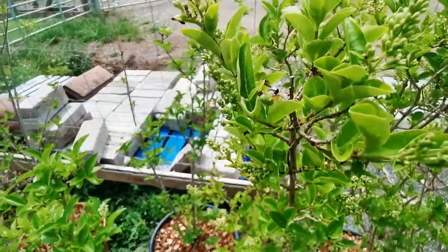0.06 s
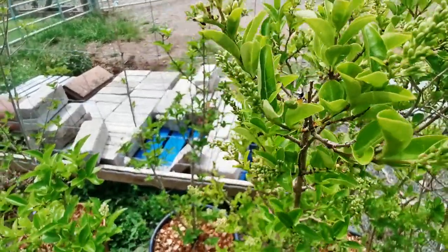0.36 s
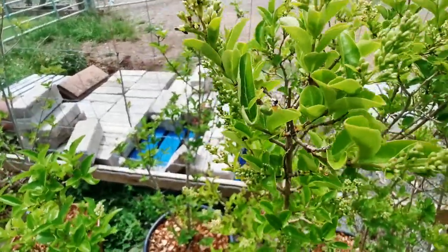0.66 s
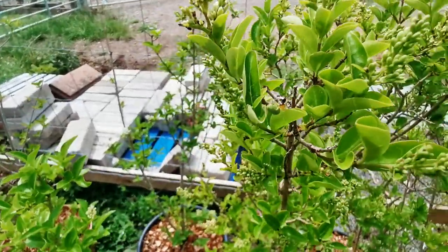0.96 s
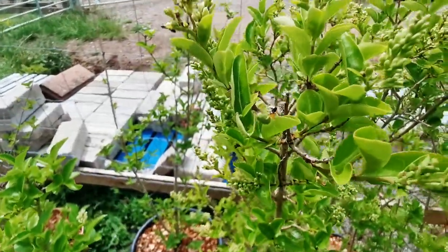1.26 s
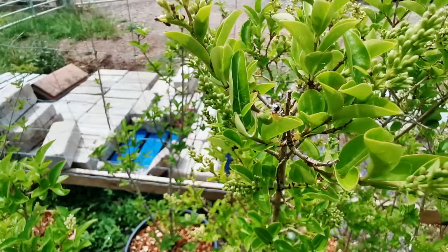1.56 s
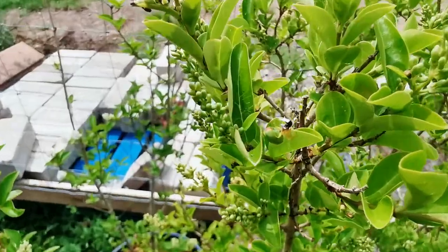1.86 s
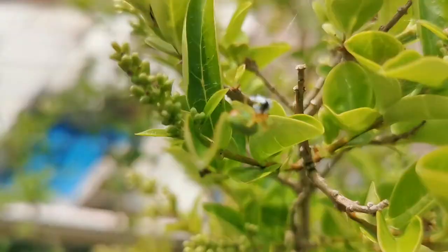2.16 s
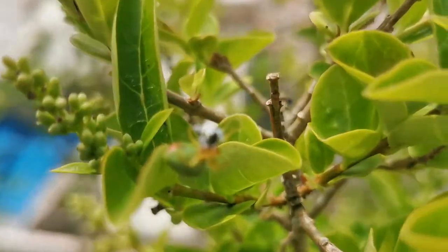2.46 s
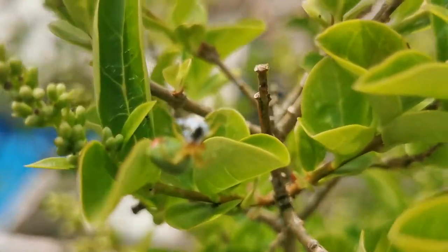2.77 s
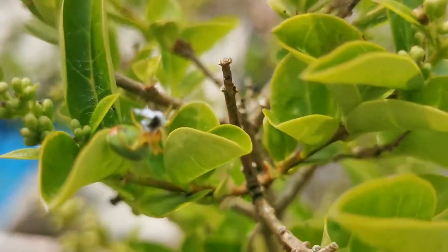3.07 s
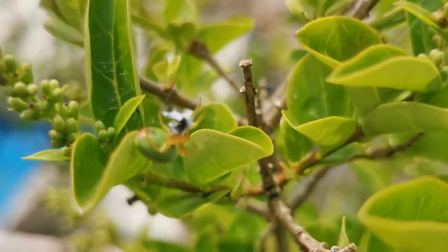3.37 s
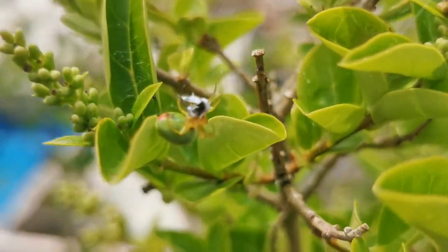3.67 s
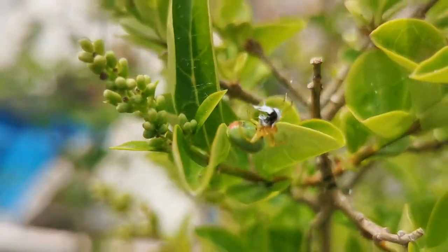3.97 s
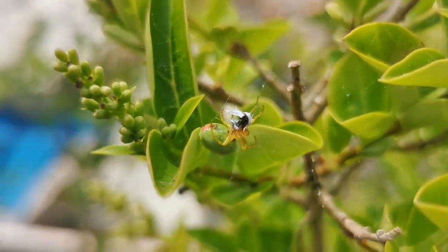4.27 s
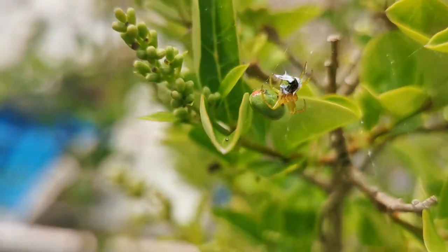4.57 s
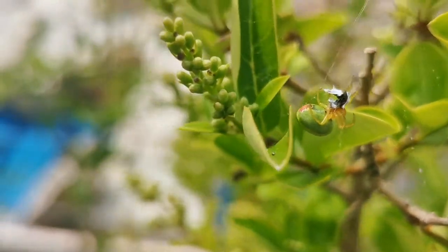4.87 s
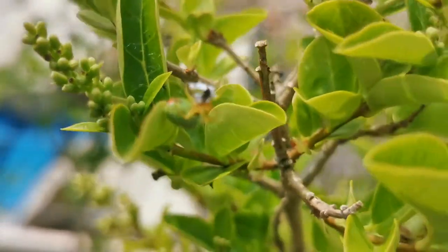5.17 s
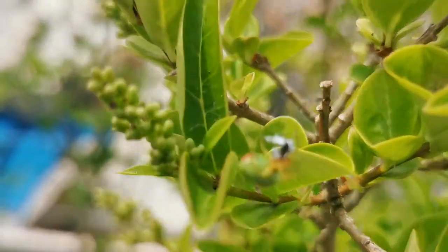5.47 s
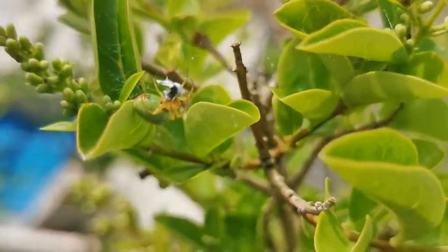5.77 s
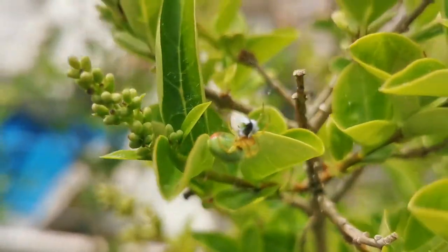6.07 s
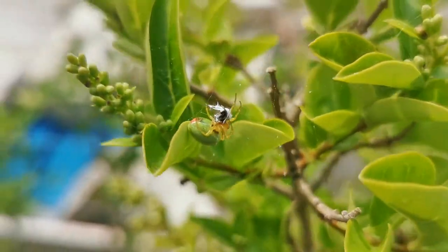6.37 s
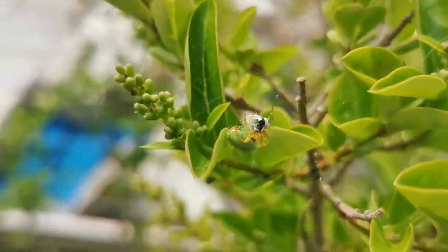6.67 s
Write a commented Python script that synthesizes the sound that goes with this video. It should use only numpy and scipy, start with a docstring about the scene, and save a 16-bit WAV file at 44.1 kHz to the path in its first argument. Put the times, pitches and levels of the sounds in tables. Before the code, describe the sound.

Close handling noise, with scratchy rubs, sharp clicks and dull knocks, gives way to low wind rumble over a faint hiss of leaves.

```python
"""A garden hedge in a breeze, heard at a handheld phone with two microphones.
Fingers shift on the case by the right microphone: skin rubs, sticks and snaps free, fingertips knock
and tick, the grip bumps. The handling is at the microphone itself, so it is dry and mostly in one channel.
Gusts buffet both ports; faint leaf hiss fills the garden."""
import sys
import numpy as np
from scipy import signal
from scipy.fft import rfft, irfft
from scipy.io import wavfile
from scipy.ndimage import uniform_filter1d

SR = 44100
rng = np.random.default_rng(int(sys.argv[2]) if len(sys.argv) > 2 else 0)


def wav_record(signal):
    """Record a signal, one row per channel, as 16-bit PCM in the file named by sys.argv[1]."""
    frames = np.transpose(np.atleast_2d(signal))
    bounded = np.clip(frames, -1, 1)
    # unit amplitude maps onto the largest positive 16-bit level
    quanta = np.round(bounded * 32767).astype(np.int16)
    wavfile.write(sys.argv[1], SR, quanta)


N = 301203
TIME_S = np.arange(N) / SR


# Finger strokes: t/s, hold/s, level/dB, dull re bright/dB, slips re hiss/dB, gap ring/dB
FINGER_STROKES = [(0.729, 0.021, -52.5, -3, 10, 5), (0.793, 0.11, -49.5, -2.5, 9.5, 0),
                  (0.978, 0.034, -51, -2.5, 1, 0), (1.073, 0.036, -66, 6, 12, 7),
                  (1.367, 0.045, -46.5, -2.5, 12.5, 10), (1.423, 0.063, -42, -2.5, 0, 9),
                  (1.502, 0.032, -44.5, 2.5, 7, 1), (1.703, 0.1, -58.5, 2, 3.5, 18),
                  (1.8, 0.21, -58.5, 1.5, 3, 7), (2.12, 0.11, -57, 1, 6, 12),
                  (2.215, 0.081, -46.5, -4, 0, 8), (2.355, .05, -59, -9, 4, -24),
                  (3.975, 0.15, -66, 5, 0, -10), (4.636, 0.072, -64, -6, -4, 16),
                  (5.261, 0.029, -41, 2, -11, 10), (5.321, 0.054, -41.5, 4.5, 0, 7),
                  (5.44, 0.028, -48.5, -1, -8, -9), (5.523, 0.017, -53, 1, 0, -29),
                  (5.575, 0.14, -66.5, -2, 4, -30), (5.763, 0.047, -50, 7.5, 0, -35),
                  (5.836, 0.031, -49, 9.5, -1, -35), (5.939, 0.031, -52, 7, -8, -11),
                  (5.988, 0.046, -61, 1, 5, -34), (6.137, .13, -65, 4.5, 4, -31)]

def finger(press_db_per_s=629, lift_db_per_s=508):
    """Friction level, dull part, grit and gap ring in dB over time; the strongest stroke sets the touch."""
    levels_db = swells(FINGER_STROKES, press_db_per_s, lift_db_per_s)
    touch_db = np.array(FINGER_STROKES)[levels_db.argmax(axis=0), 3:].T
    return levels_db.max(axis=0), *uniform_filter1d(touch_db, size=441, axis=1)


# Sliding skin spectrum: f/Hz, gain/dB
SKIN_SPECTRUM = [(120, 8), (350, 1), (750, 2), (1100, -1.5), (1600, -1), (2500, -7), (3500, -8),
                 (5500, -7.5), (7700, -28), (9200, -21.5), (11000, -18.5), (13000, -26), (15500, -30)]

def rub(level_db, dull_db, grit_db, gap_db, slips_per_s=560, spread_db=2.5, judder_db=3.5,
        split_hz=1400, gap_hz=2650, gap_width_hz=1000):
    """Tiny uneven slips over smooth hiss; the pressure judders and the gap under the finger rings."""
    sizes = gain_of(spread_db * np.minimum(rng.exponential(1, N), 3.5)) * rng.choice([-1, 1], N)
    slips = sizes * arrivals(slips_per_s)
    slip_pulse = impulse(lambda hz: db_at(SKIN_SPECTRUM, hz))
    crackle = unit_rms(signal.oaconvolve(slips, slip_pulse)[:N])
    hiss = unit_rms(noise(SKIN_SPECTRUM))
    grit, gap = gain_of(grit_db), gain_of(gap_db)
    skin = (grit * crackle + hiss) / np.hypot(grit, 1) * gain_of(judder_db * drift(160))
    dull = signal.sosfiltfilt(signal.butter(2, split_hz, fs=SR, output="sos"), skin)
    ring = unit_rms(signal.lfilter(*signal.iirpeak(gap_hz, gap_hz / gap_width_hz, SR), skin))
    bright = (unit_rms(skin - dull) + gap * ring) / (1 + gap)
    friction = bright + gain_of(dull_db) * unit_rms(dull)
    return np.array([np.zeros(N), gain_of(level_db) * friction])


# Case-to-port response: f/Hz, gain/dB
PORT_RESPONSE = [(40, -9), (400, -7), (1000, -4.5), (1600, -4), (2500, -2), (3500, -8.5), (5500, -11),
                 (7700, -24.5), (9200, -20.5), (11000, -16.5), (13000, -29), (15500, -36)]

def contact_db(hz, treble_db, ring_hz, ring_db, half_width_hz=960):
    """Spectrum of a case-borne contact at the port, with a treble shelf and one ring."""
    shelf_db = db_at([(3000, 0), (10000, treble_db)], hz)
    peak_db = ring_db / (1 + ((hz - ring_hz) / half_width_hz) ** 2)
    return db_at(PORT_RESPONSE, hz) + shelf_db + peak_db


def snap(treble_db, ring_hz, ring_db, bass_db=4, rebound_s=0.001314, rebound_ratio=0.15):
    """Skin snaps free and lands again; the gap under the finger rings."""
    delay_s = rebound_s * rng.uniform(0.702, 1.3)
    def spectrum_db(hz):
        shelf_db = db_at([(380, bass_db), (2000, 0)], hz)
        hollow_db = rebound_db(hz, delay_s, rebound_ratio)
        return contact_db(hz, treble_db, ring_hz, ring_db) + shelf_db + hollow_db
    return impulse(spectrum_db)


# Loud skin snaps: t/s, strength/dB, treble/dB, ring f/Hz, ring/dB
SKIN_SNAPS = [(0.725, -1.5, 0, 2570, 4), (0.8014, -12, 4.5, 2010, 9), (0.835, -6.5, 8.5, 3180, 17),
              (0.841, -15, 13, 3120, 19), (0.8572, -0.5, 4, 2270, 8), (0.8713, -7.5, 9, 3260, 18.5),
              (0.8774, -13, 8, 3220, 19), (0.9085, -3.5, -5, 2580, 9), (0.9177, -10, 4.5, 2650, 6),
              (0.9791, -10.5, 1, 2650, 5.5), (0.991, -4, -4.5, 5300, 14.5), (1.0109, -6.5, -7, 2650, 3),
              (1.1, -13, 1, 4750, 6.5), (1.2087, -5, -9, 2650, -0.5), (1.3733, 0.5, -7, 3200, 12.5),
              (1.3826, -9.5, -1, 2920, 15.5), (1.4161, -9, 1, 2940, 15.5), (1.4285, -4.5, -8, 2650, 10),
              (1.4481, -7, 9.5, 2300, 18), (1.4952, -11.5, 6.5, 1900, 14), (1.6846, -17, -6, 2480, 17),
              (1.7284, -19, -25, 2550, 16.5), (1.7627, -21.5, -18, 2410, 18), (1.804, -8.5, -2, 2590, 14.5),
              (1.8323, 0.5, -8, 2640, 11.5), (1.8955, -3.5, -6, 2690, 13), (1.92, -2.5, -11, 2620, 12.5),
              (1.964, 1.5, 0.5, 5600, 5), (2.1104, -3, -0.5, 2830, 18), (2.1135, -17, 6, 2600, 18),
              (2.1559, 2, -5, 2620, 13), (2.1741, -4, -8, 2590, 12.5), (2.1954, -12, 25.5, 2400, 22),
              (2.277, -2.5, -0.5, 2580, 13.5), (2.287, -14.5, 5, 2700, 21.5), (3.7762, -24, -2, 4960, 7),
              (4.132, -22.5, -7, 4650, 14), (4.677, -12.5, -6, 6000, 9), (5.3342, -8.5, -5, 2240, 10),
              (5.802, -15, 2, 1200, 16), (5.844, -9.5, 3, 1200, 1), (5.9551, 4, 3, 786, 6.5)]

def snaps(level_db, grit_db, small_per_s=65, over_stroke_db=20.5):
    """Sticking skin lets go: timed loud snaps, and random small ones that grow with friction and grit."""
    releases = arrivals(small_per_s)
    sizes = gain_of(level_db + grit_db + over_stroke_db + rng.uniform(-2, 0, N))
    right = signal.oaconvolve(releases * sizes, snap(treble_db=14, ring_hz=2450, ring_db=17))[:N]
    for start_s, db, treble_db, ring_hz, ring_db in SKIN_SNAPS:
        add(right, start_s, gain_of(db) * snap(treble_db, ring_hz, ring_db))
    return np.array([np.zeros(N), right])


# Fingertip knocks: t/s, strength/dB, low-pass f/Hz, rebound delay/s, rebound ratio (< 0 pulls away)
FINGERTIP_KNOCKS = [(0.617, 5, 1590, 0.00041, 0.86), (1.234, 1.5, 4000, 0.00072, -0.59),
                    (2.3691, -11.5, 2060, 0.00037, 0.89), (2.4831, -19.5, 2220, 0.00042, 0.8),
                    (5.2221, 0.5, 1430, 0.00063, -0.23), (6.2251, -12.5, 2120, 0.0013, 0.11)]

def knocks(thud_hz=200, thud_db=8):
    """A fingertip lands hard on the case; its quick rebound makes the knock hollow."""
    out = np.zeros((2, N))
    for start_s, db, cutoff_hz, delay_s, ratio in FINGERTIP_KNOCKS:
        def spectrum_db(hz):
            body_db = db_at([(20, -12), (thud_hz, thud_db), (900, 0)], hz)
            muffle_db = 10 * np.log10(1 + (hz / cutoff_hz) ** 10)
            return db + body_db + rebound_db(hz, delay_s, ratio) - muffle_db
        add(out[1], start_s, impulse(spectrum_db))
    return out


# Grip bumps, the first a light fingertip knock: t/s, strength/dB, thud f/Hz, low-pass f/Hz
GRIP_BUMPS = [(0.1055, 5, 201, 1080), (0.578, 12, 100, 1100), (0.6531, 15.5, 91, 636), (0.667, 14, 90, 810),
              (0.6957, 18, 90, 302), (0.7153, 9, 135, 1500), (0.7932, 8, 149, 1500),
              (1.5359, 21, 157, 2200), (2.0014, 17.5, 233, 343), (2.2129, 9.5, 248, 2200),
              (2.306, 11, 220, 570), (2.3304, 8.5, 111, 600), (2.371, 17.5, 85.4, 623),
              (2.4828, 9, 101, 840), (2.5928, 7, 110, 440), (2.874, 7.5, 97, 570), (4.408, 4.5, 205, 272),
              (5.2221, 37.5, 88, 467), (5.2433, 28, 85.6, 268), (5.3181, 19, 93, 1490)]

def bumps():
    """The grip thuds softly on the case by the right port; near 0.1 s a fingertip knocks lightly."""
    out = np.zeros((2, N))
    for start_s, db, thud_hz, cutoff_hz in GRIP_BUMPS:
        add(out[1], start_s, gain_of(db) * thud(thud_hz, cutoff_hz))
    return out


# Case scuffs, and the diffuse case ring after the knock at 1.234 s: t/s, left level/dB, right level/dB, decay
# constant/s, ring f/Hz
CASE_SCUFFS = [(1.059, -75, -67, 0.083, 4500), (1.2338, -37, -35.5, 0.0057, 2600),
               (1.3, -70, -75, 0.23, 4000), (5.904, -47, -36.5, 0.014, 2490)]

def scuffs(width_hz=2200, grain_db=3):
    """Gritty brushes in one broad resonance, carried through the case to both ports; the row at 1.234 s is the
    diffuse ring a hard knock leaves in the case."""
    out, age_s = np.zeros((2, N)), TIME_S[:SR // 2]
    for start_s, left_db, right_db, decay_s, ring_hz in CASE_SCUFFS:
        ring = impulse(lambda hz: -20 * np.log10(1 + ((hz - ring_hz ** 2 / (hz + 1)) / width_hz) ** 2))
        grain = gain_of(grain_db * drift(360)[:len(age_s)])
        for channel, db in zip(out, (left_db, right_db)):
            grit = grain * rng.standard_normal(len(age_s))
            brush = unit_rms(signal.oaconvolve(grit, ring)[:len(age_s)])
            add(channel, start_s, gain_of(db) * brush * np.exp(-age_s / decay_s))
    return out


# Case ticks: t/s, strength/dB, high-pass f/Hz, ring f/Hz, channel (0 left, 1 right)
CASE_TICKS = [(1.0615, -11.5, 4000, 5550, 0), (1.0741, -11.5, 4000, 5140, 0), (1.2027, 3, 4130, 6100, 0),
              (2.4173, -21.5, 2000, 2500, 1), (2.713, -27, 2960, 3900, 1), (3.108, -6, 1620, 2620, 1),
              (3.4692, -21.5, 3000, 5650, 1), (4.364, -28.5, 5000, 7200, 0)]

def ticks(treble_db=6.5, ring_db=8):
    """Light, hard contacts: a brief ring, no bass."""
    out = np.zeros((2, N))
    for start_s, db, cutoff_hz, ring_hz, channel in CASE_TICKS:
        def spectrum_db(hz):
            bass_cut_db = 10 * np.log10(1 + (cutoff_hz / (hz + 1)) ** 5)
            return db + contact_db(hz, treble_db, ring_hz, ring_db) - bass_cut_db
        add(out[channel], start_s, impulse(spectrum_db))
    return out


# Ring and brush envelope, right port: t/s, level/dB
RING_BRUSH_LEVEL = [(3.09, -98), (3.12, -65.5), (3.2, -71), (3.3, -100), (5.95, -98), (6.08, -85),
                    (6.2, -67), (6.3, -66), (6.45, -70.5), (6.83, -74)]
# Ring and brush resonances: f/Hz, width/Hz, gain/dB
RING_BRUSH_MODES = [(2390, 520, -3), (4960, 1200, -13.5)]

def ring_and_brush(left_db=-7):
    """Resonant hiss: a faint ring after the click near 3.1 s, then soft fingertip brushing from 6 s."""
    hz = np.fft.rfftfreq(N, 1 / SR)
    rings = sum(gain_of(db) / (1 + (2 * (hz - ring_hz) / width_hz) ** 2)
                for ring_hz, width_hz, db in RING_BRUSH_MODES)
    hiss = unit_rms(irfft(rfft(rng.standard_normal((2, N))) * rings, N))
    return hiss * gain_of(curve(RING_BRUSH_LEVEL)) * gain_of([[left_db], [0]])


# Gusts, left port: t/s, hold/s, level/dB
LEFT_GUSTS = [(0.1, 0.055, -48.5), (0.78, 0.29, -52), (2.13, 0.17, -47), (2.93, 0.14, -47),
              (3.3, 0.37, -55), (4.01, 0.056, -40.5), (4.69, .1, -37), (4.86, .52, -32.5),
              (5.48, 0.054, -38.5), (5.79, 0.1, -41.5), (6.18, 0.31, -45.5), (6.67, 0.026, -41)]
# Wind and hand rumble, right port: t/s, level/dB
RIGHT_RUMBLE = [(0, -50.5), (0.54, -55), (0.7, -39), (1.02, -48.5), (1.22, -37), (1.55, -38.5),
                (1.68, -41.5), (2.28, -39), (2.5, -47.5), (3.1, -50), (3.9, -53.5), (4.38, -38.5),
                (4.7, -43), (4.88, -48), (5.13, -44), (5.33, -31), (5.55, -54), (6.25, -50), (6.83, -57)]
# Large and small eddy spectra: f/Hz, gain/dB
LARGE_EDDY_SPECTRUM = [(4, -9), (12, -10.5), (27, 3.5), (45, 6), (85, -1), (140, -12), (200, -19.5),
                       (300, -32.5), (500, -39), (1200, -77)]
SMALL_EDDY_SPECTRUM = [(30, -41), (80, 8), (150, 2), (250, -9.5), (350, -15.5), (480, -43.5), (800, -43),
                       (2000, -71)]

def buffet(calm_db=-60.5, lump_db=3.5, small_db=-7, ref_db=-38, small_db_per_db=0.1, eddies_per_s=40):
    """Eddies, independent at each port; stronger gusts carry a larger share of small ones."""
    out = []
    eddy = impulse(lambda hz: db_at(SMALL_EDDY_SPECTRUM, hz))
    gust_db = swells(LEFT_GUSTS, rise_db_per_s=174, fall_db_per_s=200).max(axis=0)
    for level_db in (np.maximum(gust_db, calm_db), curve(RIGHT_RUMBLE)):
        large = unit_rms(noise(LARGE_EDDY_SPECTRUM) * gain_of(lump_db * drift(40)))
        pushes = rng.choice([-1, 1], N) * rng.uniform(0.49, 1, N) * arrivals(eddies_per_s)
        small = unit_rms(signal.oaconvolve(pushes, eddy)[:N])
        small_gain = gain_of(small_db + small_db_per_db * (level_db - ref_db))
        out.append(gain_of(level_db) * (large + small_gain * small))
    return np.array(out)


# Wind puffs: t/s, strength/dB, thud f/Hz
WIND_PUFFS = [(4.785, 25, 205), (4.8406, 29.5, 204), (4.851, 27.5, 176), (4.93, 28.5, 85),
              (5.0385, 21, 190), (5.125, 25, 140), (5.186, 22.5, 166), (5.496, 17.5, 157),
              (6.2534, 20, 187), (6.7025, 19, 112)]

def puffs(cutoff_hz=181):
    """Single puffs of wind pop on the left port."""
    out = np.zeros((2, N))
    for start_s, db, thud_hz in WIND_PUFFS:
        add(out[0], start_s, gain_of(db) * thud(thud_hz, cutoff_hz))
    return out


# Leaf and air spectra: f/Hz, density/(dB per Hz)
LEAVES_LEFT = [(300, -99), (500, -103), (750, -103), (1200, -109), (1700, -113), (2400, -114), (3100, -111),
               (4000, -114), (5200, -116), (6500, -118), (8500, -123), (11000, -126), (13000, -126),
               (15500, -130)]
LEAVES_RIGHT = [(300, -92.5), (500, -97.5), (750, -96.5), (1200, -103), (1700, -104), (2400, -100),
                (3100, -99), (4000, -106), (5200, -114), (6500, -123), (8500, -123), (11000, -116),
                (13000, -117), (15500, -122)]

def leaves():
    """Steady hiss of far leaves and open air."""
    return np.array([noise(LEAVES_LEFT), noise(LEAVES_RIGHT)])


def thud(thud_hz, cutoff_hz, q=1.45):
    """A pressure push that swings back once or twice."""
    def spectrum_db(hz):
        detune = q * (hz / thud_hz - thud_hz / (hz + 1))
        muffle = 1 + (hz / cutoff_hz) ** 6
        return -10 * np.log10((1 + detune ** 2) * muffle)
    return impulse(spectrum_db)


def rebound_db(hz, delay_s, ratio):
    """Comb response of a contact plus one delayed copy."""
    return 20 * np.log10(abs(1 + ratio * np.exp(-2j * np.pi * hz * delay_s)))


def impulse(spectrum_db, size=4096):
    """Minimum-phase pulse with the spectrum spectrum_db(hz)."""
    hz = abs(np.fft.fftfreq(size, 1 / SR))
    log_gain = np.log(gain_of(np.maximum(spectrum_db(hz), -100)))
    return np.fft.ifft(np.exp(np.conj(signal.hilbert(log_gain)))).real[:size // 2]


def noise(spectrum):
    """Noise of the given density in dB per Hz."""
    gain = gain_of(db_at(spectrum, np.fft.rfftfreq(N, 1 / SR)))
    return irfft(rfft(rng.standard_normal(N)) * gain, N) * np.sqrt(SR / 2)


def drift(rate_hz):
    """Smooth random motion, rms 1, rolling off at rate_hz."""
    hz = np.fft.rfftfreq(N, 1 / SR)
    band = np.exp(-(hz / rate_hz) ** 2) * (hz > rate_hz / 10)
    return unit_rms(irfft(rfft(rng.standard_normal(N)) * band, N))


def arrivals(per_s):
    """Random unit impulses at a mean rate."""
    return rng.random(N) < per_s / SR


def swells(rows, rise_db_per_s, fall_db_per_s):
    """One dB curve per row: rise until t, hold, fall."""
    return np.array([db - rise_db_per_s * np.maximum(t_s - TIME_S, 0)
                     - fall_db_per_s * np.maximum(TIME_S - t_s - hold_s, 0)
                     for t_s, hold_s, db, *_ in rows])


def curve(points):
    """A timed level at every sample."""
    return np.interp(TIME_S, *np.transpose(points))


def db_at(spectrum, hz):
    """Interpolates a spectrum over log frequency."""
    knots_hz, db = np.transpose(spectrum)
    return np.interp(np.log(hz + 1), np.log(knots_hz + 1), db)


def gain_of(db):
    """Decibels to amplitude."""
    return 10 ** (np.asarray(db) / 20)


def unit_rms(x):
    """Scales to rms 1."""
    return x / np.sqrt(np.mean(x ** 2) + 1e-20)


def add(mix, start_s, sound):
    """Mixes a sound in at start_s."""
    part = mix[max(round(start_s * SR), 0):][:len(sound)]
    part += sound[:len(part)]


def scene():
    """Hand on the case, wind on the ports, leaves behind."""
    level_db, dull_db, grit_db, gap_db = finger()
    sliding = rub(level_db, dull_db, grit_db, gap_db) + snaps(level_db, grit_db)
    handling = sliding + ring_and_brush() + scuffs() + knocks() + bumps() + ticks()
    return handling + buffet() + puffs() + leaves()


def record(dry):
    """The phone's band limit."""
    cutoff_hz = 16200
    lowpass = signal.firwin(255, cutoff_hz, window=("kaiser", 9), fs=SR)
    return signal.oaconvolve(dry, lowpass[None], "same")


dry = scene()
out = record(dry)
wav_record(out)
```